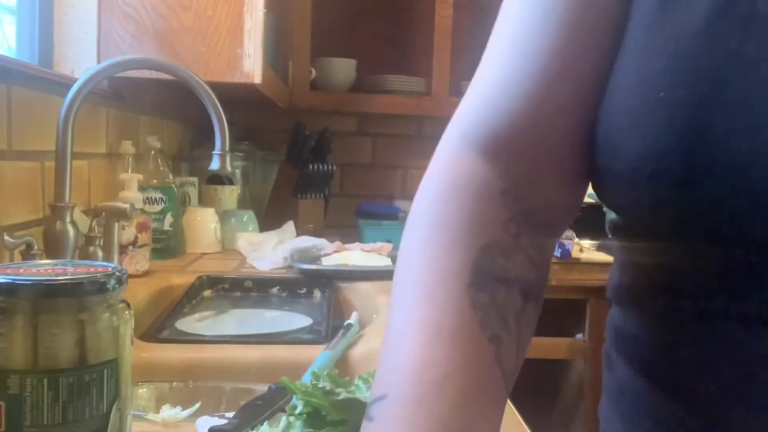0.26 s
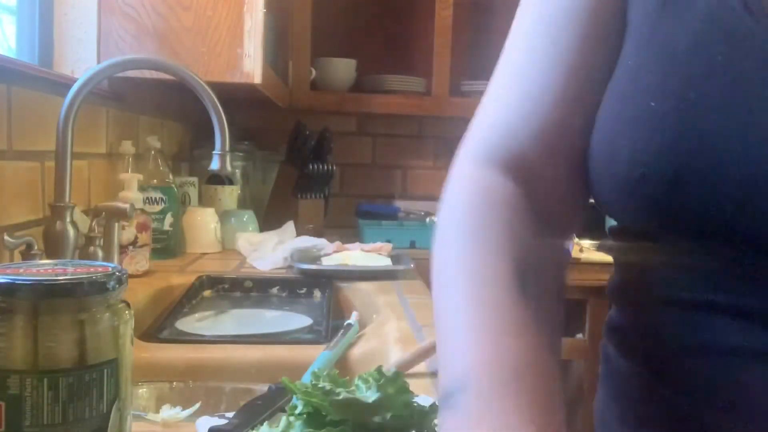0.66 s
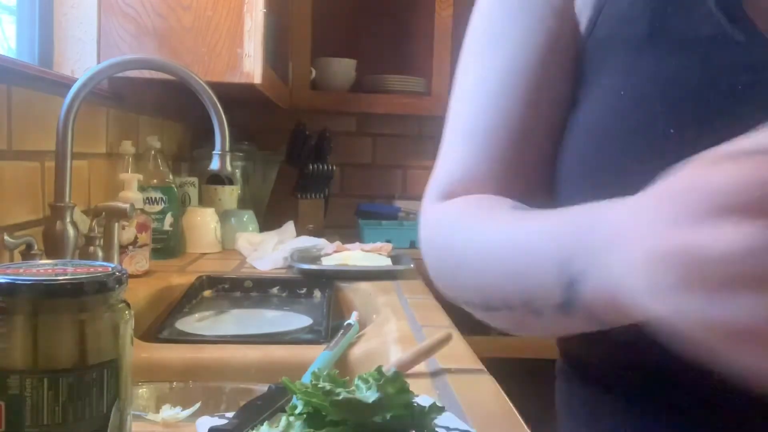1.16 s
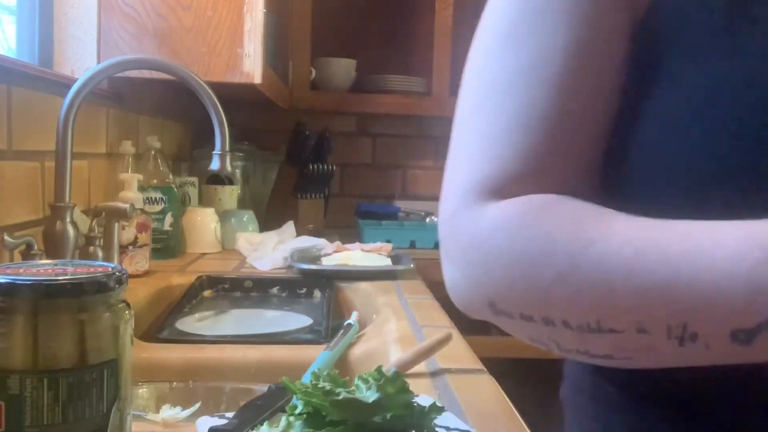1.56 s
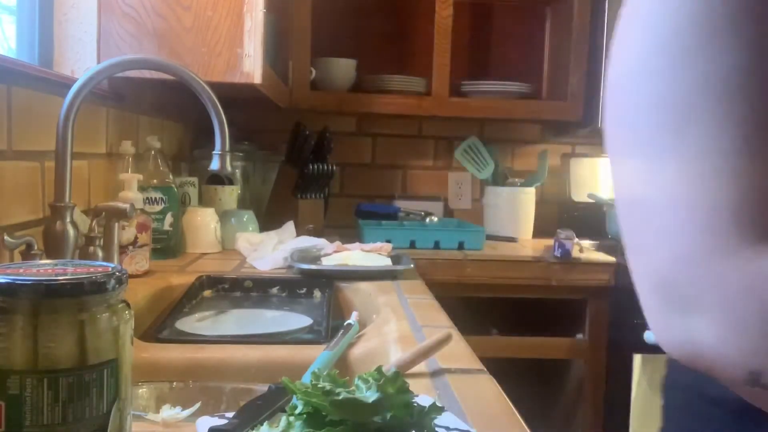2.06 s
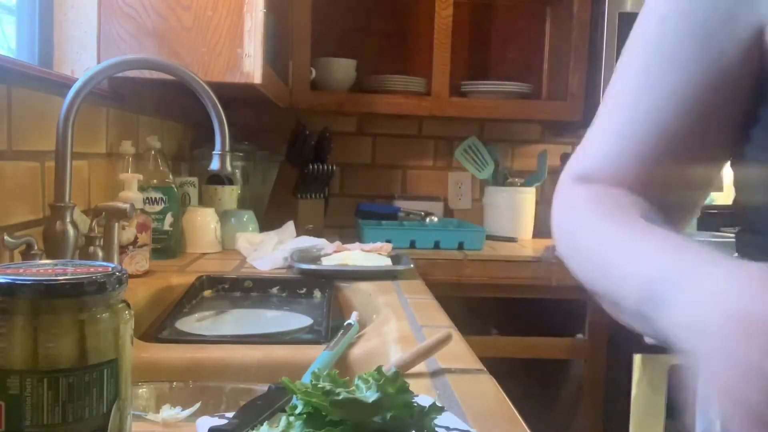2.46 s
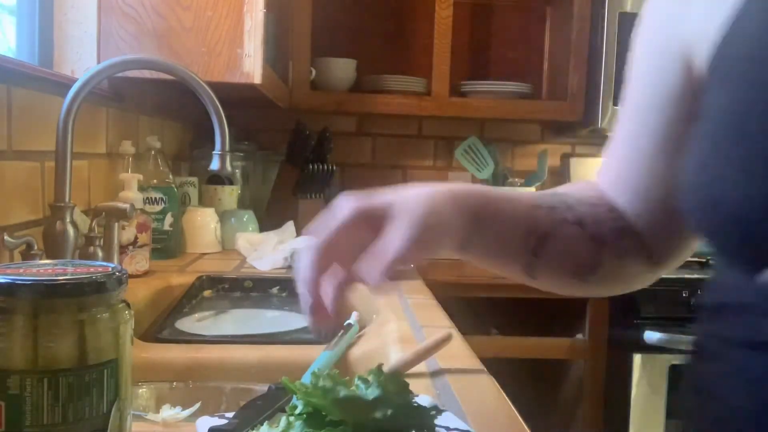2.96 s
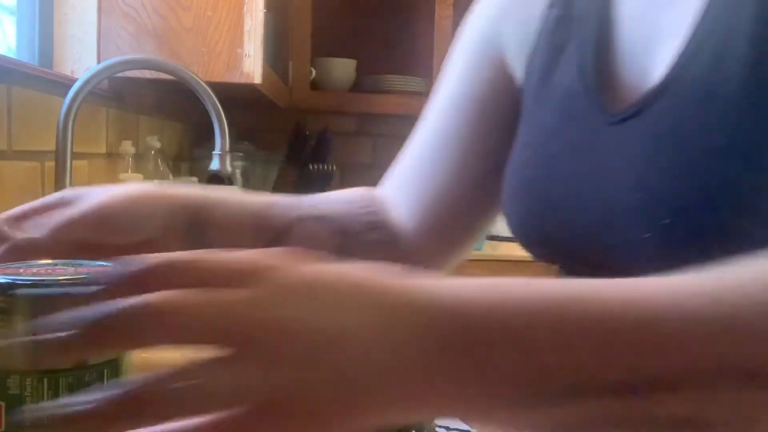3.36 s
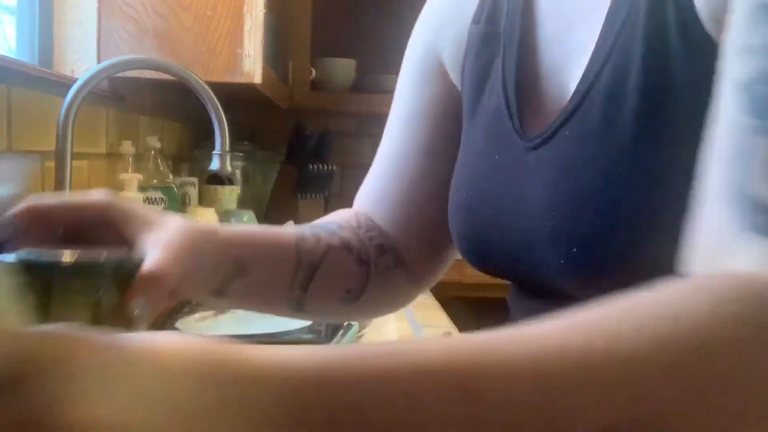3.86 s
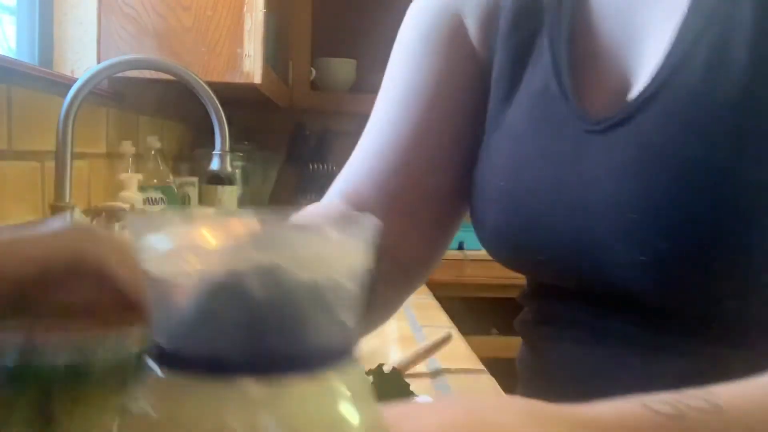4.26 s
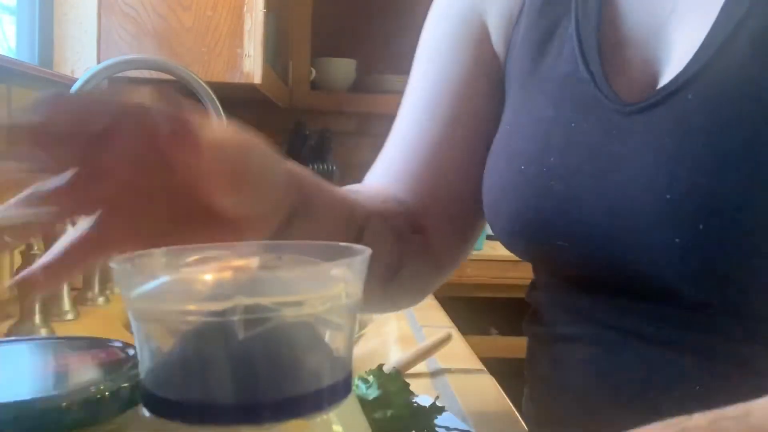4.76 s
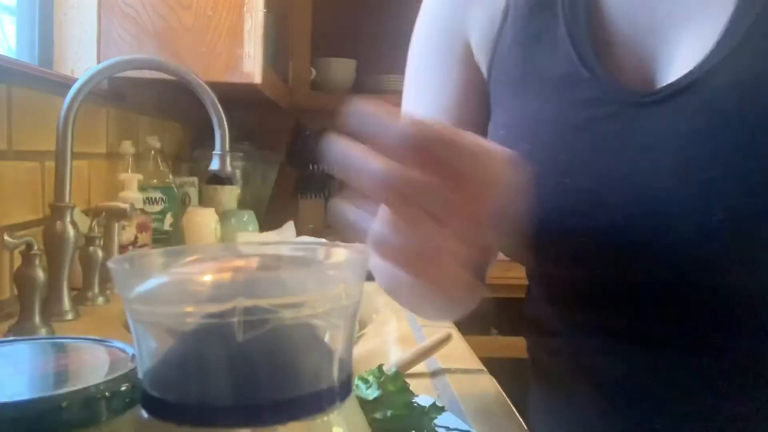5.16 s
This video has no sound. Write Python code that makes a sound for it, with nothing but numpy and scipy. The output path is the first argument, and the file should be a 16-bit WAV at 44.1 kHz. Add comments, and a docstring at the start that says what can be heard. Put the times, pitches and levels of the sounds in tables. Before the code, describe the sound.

Hands handle crackly plastic on a worktop: about one second of crowded clicks, hollow rattles and a brief ribbed buzz, then sparser bright snaps and a knock. After a quiet pause with soft fabric swishes, light wooden taps and a short pitched squeak lead to one sharp, woody jar knock with a smaller rebound. Close stereo phone microphone, short room reflections, faint low hum underneath.

```python
"""Tub and jar on a kitchen counter

Hands shift a plastic tub and leafy food on a wooden counter, then lift a jar and set it down with a sharp knock
and one bounce, close to a phone on the same counter. Scrapes are dense random slips, chatter is nearly even slips,
snaps are short noise bursts and knocks are brief pushes; they ring damped modes of plastic and wood.
Clothing swishes faintly as filtered noise, and a fridge hums in a small tiled room.
"""
import sys
import numpy as np
from scipy import signal
from scipy.fft import rfft, irfft, next_fast_len
from scipy.io import wavfile
from scipy.ndimage import uniform_filter1d

SR = 44100
rng = np.random.default_rng(int(sys.argv[2]) if len(sys.argv) > 2 else 0)


def waveform_to_disk(signal):
    """Save audio, clipped to [-1, 1], as 16-bit WAV at the path in sys.argv[1]."""
    frames = np.transpose(np.atleast_2d(signal))
    scaled = np.clip(frames, -1, 1) * 32767
    samples = np.round(scaled).astype(np.int16)
    wavfile.write(sys.argv[1], SR, samples)


N = 239091
t = np.arange(N) / SR  # time in seconds

# Strokes of dragged and squeezed plastic. Each row: peak time in seconds, scrape level in dB, swell and fade
# in seconds, then fizz, tub ring and counter rumble in dB above the scrape, and ring centre in Hz.
STROKES = [(.002, -36.5, 0.024, 0.13, -10, -1, -18, 710), (0.059, -52, 0.21, 0.042, 16, 22, -7.5, 830),
           (.124, -30, 0.002, 0.02, 0, 3.5, -24, 710), (0.175, -46.5, 0.12, 0.037, 5, 15, 8, 606),
           (0.247, -35.5, 0.0047, 0.21, 4, 9.5, -26, 786), (0.325, -40.5, 0.13, 0.02, 6, 11, -16, 807),
           (0.363, -46.5, 0.04, 0.051, -12, 17, 18.5, 750), (.385, -54, 0.025, 0.11, 2, -2, -31, 900),
           (0.454, -38.5, 1, 0.055, 1, 3.5, -9, 890), (0.534, -43, 0.0048, 0.17, 6, -6, -12, 965),
           (.548, -41, 0.029, 0.17, 9.5, 6.5, -20, 960), (0.594, -43, 0.25, 0.027, 2, 8, -16, 935),
           (0.678, -29.5, 0.0031, 0.025, 2, 5, -14, 517), (0.746, -38.5, 0.13, 0.26, 0, 5, 0, 745),
           (.925, -51.5, 0.24, 0.19, 5.5, 10.5, -9, 930), (.966, -31, .004, .016, -3, 3, -10, 550),
           (1.0, -65.5, .04, 1, 11, 14, 12, 600), (1.043, -38.5, 0.0042, 0.035, -12, -4, -15, 760),
           (1.112, -66.5, 0.14, 0.16, -7, 17, 2.5, 780), (1.331, -54.5, 0.0065, 0.051, 0.5, 4, -2, 426),
           (1.52, -32, 0.035, 0.053, 0.5, 3.5, -2, 490), (1.669, -38.5, 0.29, 0.19, 1, -3, -2.5, 635),
           (1.779, -62, 0.12, 0.35, -0.5, -2, -12.5, 620), (1.908, -48, 0.042, 0.14, 0, 1, -15, 470),
           (1.997, -45.5, 0.041, 0.23, 2.5, 4, 2, 500), (2.136, -42, 0.034, 0.072, -1, -3.5, -7, 726),
           (2.17, -60.5, 0.059, 0.78, 1.5, 3.5, -2, 500), (2.31, -47.5, 0.0071, 0.14, 13.5, 9.5, 4.5, 450),
           (3.7, -65, 0.043, 0.27, 3, 2, 25, 388), (3.765, -59, 0.069, 0.1, -10, 24, 14, 396),
           (3.792, -52, 0.095, 0.097, -1, 9.5, 14.5, 420), (3.884, -44.5, 0.042, 0.062, -4.5, 2, -20, 795),
           (3.935, -69, 0.11, 0.07, 7, -4, 11, 1090), (3.96, -59.5, 0.05, 0.063, -8, 7.5, 18, 680),
           (4.385, -38, .007, .15, -5, 16, 16, 620), (4.554, -69.5, 0.11, 0.25, 9, 26, 27, 446),
           (4.575, -63.5, 0.019, 0.066, -13, 30.5, 42.5, 443), (4.794, -63, 0.023, 0.05, 14.5, 4, 16, 696),
           (4.83, -61, 0.18, 0.027, -2, 2.5, 0, 542)]
# Colour of the scrape. Each row: frequency in Hz, relative level in dB per Hz.
SCRAPE_COLOUR = [(1200, -8), (2000, -1.5), (3500, 3.5), (5000, -1.5), (7000, -25)]
# Colour of the fizz. Each row: frequency in Hz, relative level in dB per Hz.
FIZZ_COLOUR = [(4000, -9), (6000, -1.5), (9000, -2), (12000, -6), (15500, -13.5), (17000, -46.5)]
# Resonances of the tub walls. Each row: frequency in Hz, width in Hz, relative level in dB.
TUB_MODES = [(468, 46, 1), (599, 160, -14), (890, 360, 0), (1182, 93, 1.5), (1566, 160, -3.5)]
# Ribbed plastic under a sliding edge. Each row: start and end in seconds, relative level in dB,
# slips per second at the start, the rate it heads for, and a last rate that is not used.
CHATTER = [(0.311, .331, -29, 208.3, 189.3, 174), (0.373, .468, -30.5, 234.9, 225.4, 119.1)]
# Resonances of the ribs. Each row: frequency in Hz, width in Hz, relative level in dB.
RIB_MODES = [(826, 70, -1.5), (1586, 130, -3.5), (1990, 86, -1), (2815, 200, 3.5), (3135, 160, 0),
             (3610, 92, -2)]
# Snaps and taps. Each row: start in seconds, crack peak in dB, tub ring above the crack in dB,
# pitch of the crack in Hz, ring centre in Hz, pitched part of the crack against its noise in dB.
TAPS = [(0.0098, -22.5, 0.5, 3520, 614, -13.5), (.022, -27, -11, 3800, 700, -10),
        (0.0336, -23.5, -33, 3720, 676, -11), (0.0558, -31, 4, 4020, 446, 1),
        (0.094, -41, -12, 5360, 450, -5), (0.1233, -24, -2, 4400, 883, 0), (0.147, -31, 2, 1780, 424, -4),
        (0.212, -33, 2, 5600, 1180, -1), (0.2334, -23.5, 4.5, 2704, 851, -11),
        (0.2472, -30, 16, 2130, 854, -24.5), (0.2555, -20.5, 6.5, 2650, 900, -14),
        (0.262, -24, 10, 2930, 900, 4), (0.279, -32, -4, 2060, 870, 6), (.288, -35, 0, 2040, 870, 5),
        (0.359, -34, 1, 2000, 1200, -7), (0.4705, -27, -0.5, 2480, 872, -10),
        (0.4905, -48, 12.5, 2000, 877, -8), (0.5245, -26.5, -2.5, 2000, 980, -5),
        (0.594, -41, 10.5, 1940, 800, -10), (0.601, -29, 0, 1920, 396, -15),
        (0.6792, -24, -12, 1720, 1200, 5), (0.7088, -36, 12, 1980, 1100, -6),
        (0.7145, -23, 3, 2020, 570, -3), (0.7373, -25.5, 12, 2000, 1180, 0),
        (0.7575, -35.5, -5, 2280, 1100, 3), (0.767, -31, -8, 2030, 1100, 9),
        (0.7495, -25.5, -22, 2030, 393, -4), (0.7758, -30, -23, 3430, 1170, -6),
        (0.871, -36.5, 6, 1860, 900, -1), (0.9164, -26.5, 1, 2610, 1160, -6),
        (0.9645, -16.5, 5.5, 1866, 870, -4), (0.981, -30, -5, 1950, 406, -15),
        (1.043, -30, -2, 1930, 1100, -18), (1.105, -37, -19, 3020, 800, -19),
        (1.3316, -41, -33.5, 2980, 353, 9), (1.475, -37, -4, 10900, 479, -11),
        (1.497, -45, -20, 9000, 480, -18), (1.511, -24, -32.5, 1920, 450, -9),
        (1.5781, -30.5, -29, 8450, 484, 9), (1.6118, -27.5, -5.5, 5770, 455, -2),
        (1.636, -41, -15, 7000, 480, -10), (1.6579, -18.5, -8, 4640, 525, -10),
        (1.671, -15, -19.5, 8670, 832, -6.5), (1.697, -35, -20, 8500, 480, -6),
        (1.71, -35, -20, 8500, 480, 3), (1.7676, -33, -5, 2980, 365, 4),
        (1.9066, -27.5, -7, 2270, 383, 5.5), (1.9985, -22, -33.5, 11070, 417, -13),
        (2.035, -41, 1, 7500, 900, -17), (2.0852, -38, -5.5, 5660, 390, -7),
        (2.121, -41, -23, 3450, 450, 10), (2.1332, -32.5, -27, 2050, 450, -2),
        (2.212, -45, -15, 7430, 458, 6), (2.3097, -29, -16, 7900, 700, -10),
        (3.703, -37.5, 1.5, 3500, 355, -8.5), (3.748, -48, 15, 2530, 600, 2),
        (3.794, -47, 12, 3300, 600, -1), (3.8461, -41.5, 10, 2000, 370, 5),
        (3.8764, -33, -31, 2180, 1240, 23), (3.883, -39.5, -6, 2580, 1200, 8),
        (3.896, -43, -22, 2280, 810, 3), (3.9117, -41, -4, 1800, 800, 7), (3.921, -39, 3, 1770, 800, 14),
        (3.9302, -42.5, 10.5, 1710, 660, 17.5), (3.939, -46, -11, 1790, 660, 12),
        (3.957, -44, 3, 1880, 659, 15), (4.047, -67.5, 18.5, 2460, 1030, -7),
        (4.3818, -29, 9, 2000, 1150, 9.5), (4.553, -34.5, 12, 2020, 800, 4),
        (4.789, -29.5, -26, 11400, 1220, 2.5)]
# Jar or tub knocked on the counter. Each row: start in seconds, upper ring peak in dB, contact in seconds,
# deep boom above the upper ring in dB, share of the free ring time, focus of the ring in Hz,
# rattle of the base against the upper ring in dB.
KNOCKS = [(0.2458, -19.5, 0.00081, -43, 0.042, 610, -13), (0.2617, -23, 0.0022, -27.5, 0.034, 653, -8),
          (0.36, -19, 0.0033, -9, 0.12, 600, -20), (.681, -27.5, 0.00075, -11.5, 0.069, 400, -17),
          (.7155, -22.5, .001, -6.5, 0.046, 560, -7), (.7405, -22.5, 0.00093, -31, 0.039, 327, -6),
          (0.744, -24, 0.01, -0.5, 0.1, 300, -23), (0.9654, -13.5, 0.00093, -12.5, 0.023, 600, -16),
          (.968, -19.5, 0.0014, -13.5, 0.035, 480, -28), (2.3128, -18, 0.0014, -20, 0.031, 420, -21.5),
          (2.321, -30, 0.002, -4, 0.074, 300, -14), (3.7, -44, 0.0015, -9.5, .15, 400, -19),
          (3.738, -38.5, 0.0012, -10, 0.16, 600, -3.5), (3.75, -26, 0.0022, -23, 0.13, 378, -16),
          (3.765, -23.5, 0.0011, -23.5, 0.074, 400, -28), (3.777, -28.5, 0.0022, -11.5, 0.059, 330, -13),
          (3.797, -24, 0.0027, -10.5, 0.1, 250, -31.5), (4.3795, -18.5, 0.00028, -15, 0.053, 1500, -6),
          (4.3813, -4.5, .00045, -15.5, 0.041, 1200, -9.5), (4.3833, -9, 0.00088, -13.5, 0.054, 510, -11.5),
          (4.384, -13, 0.0008, 8.5, 0.14, 470, -5), (4.396, -10, 0.00061, -4.5, 0.22, 603, -5),
          (4.41, -14.5, 0.0011, -9, 0.25, 500, -10), (4.427, -17.5, 0.00035, -18, 0.51, 800, -4.5),
          (4.478, -21, 0.001, -1, 0.12, 700, -2), (4.561, -32.5, 0.0029, 10.5, 0.081, 300, -7),
          (4.574, -15, 0.0014, -8.5, 0.092, 447, -29), (4.582, -15.5, 0.00107, 1, 0.15, 443, -13),
          (4.602, -24.5, 0.0014, -1, 0.33, 456, -1)]
# Resonances of the worktop. Each row: frequency in Hz, relative level in dB, free time to fall 60 dB in seconds.
COUNTER_MODES = [(48, -8, 0.35), (92.4, -10.5, 0.55), (116.3, 1, 0.28), (166.2, -0.5, 0.12),
                 (195, -3.5, 0.17), (250, -1.5, 0.12), (307, -6.5, 0.16), (391, -2.5, 0.32),
                 (462.3, 1, 0.36), (535, -5.5, 0.29), (688, -21.5, 0.31), (859, -3.5, 0.2),
                 (1243, -9.5, 0.15), (1260, -6, 0.33), (1560, -4, 0.21), (1810, -11.5, 0.4),
                 (1940, -9.5, 0.81), (2340, -23.5, .2), (2830, -25, .15), (3180, -40, .2),
                 (3890, -34.5, .29)]
# Clothing. Each row: start of full level in seconds, level in dB, swell, hold and fade in seconds,
# fuller low part above that level in dB.
SWISHES = [(1.145, -80, .1, 0.0054, 0.53, 1), (1.342, -62.5, 0.24, 0.0067, 0.12, -7),
           (2.43, -66, 0.11, .12, 0.11, -11), (2.833, -68.5, 0.074, 1, 0.47, -2.5),
           (3.376, -61.5, 0.25, 0.0064, 0.37, -5.5), (3.69, -59.5, 0.022, 0.0061, 0.038, -0.5),
           (4.19, -70.5, 0.33, 0.444, 0.044, -0.5), (4.583, -65, 0.12, 0.014, 0.058, 15.5),
           (4.99, -64.5, 0.14, 0.69, 0.11, -8), (5.156, -66, 0.3, 0.0077, 0.63, -5.5)]
# Colour of the cloth hiss. Each row: frequency in Hz, relative level in dB per Hz.
CLOTH_COLOUR = [(1500, -16), (2500, -3.5), (4000, 0.5), (6000, 1), (9000, -5), (15500, -8.5),
                (17000, -41.5)]
# Colour of its fuller low part. Each row: frequency in Hz, relative level in dB per Hz.
CLOTH_LOW_COLOUR = [(350, -22.5), (700, -0.5), (1400, -1.5), (2200, -6.5), (3500, -39)]
# Colour of the background noise. Each row: frequency in Hz, relative level in dB per Hz.
KITCHEN_COLOUR = [(13, -57.5), (22, -33), (43, -10), (65, -7), (88, -4.5), (166, -35), (245, -16),
                  (351, -24.5), (392, -17.5), (503, -37), (978, -68), (1360, -42), (1800, -76.5),
                  (10300, -62.5), (16500, -73)]
# Hum of the fridge. Each row: frequency in Hz, width in Hz, average (rms) level in dB.
FRIDGE_HUM = [(59.73, 0.77, -49), (114.4, 7.2, -56.5)]
# Difference between the microphone ports. Each row: frequency in Hz, side minus mid in dB.
PORT_COLOUR = [(60, -25.5), (110, -18), (200, -20), (380, -8.5), (700, -2), (1290, -3.5), (2380, 4),
               (4400, 0.5), (8120, 1.5), (15000, -1.5)]

FIZZ_LINGERS, RING_LINGERS, RUMBLE_LINGERS = 0.73, 1.21, 1.35  # fade times relative to the scrape
SWING_DB = 30  # swell and fade times are the times to cross this range
DRAG_PAN_DB, JAR_PAN_DB = 1, 2  # left minus right
THUMP_DB, TAP_SCATTER_DB = -28.5, 3.5  # counter thump against the crack; left-right spread of the taps
FOCUS_DB = 2.5  # fall of a worktop mode one octave from the focus
THUD_DB, THUD_CYCLES = -2, 2.3  # thud against the upper ring; its ring time in cycles
KITCHEN_DB = -50
ROOM_T60_S, ROOM_TREBLE_T60_S, ROOM_DB = 0.25, 0.16, -13.5  # times to fall 60 dB; tail level
PORTS_DB = -1
TOP_HZ = 16700


def drag():
    """Plastic sticks and slips unevenly, shaking the tub walls, while separate noise rumbles in the counter."""
    happens = rng.random(N) < .4
    slips = rng.standard_normal((2, N)) * undb(1.5 * rng.exponential(size=N)) * happens
    slips = slips * undb(1.14 * walk(180))
    power, octaves = np.zeros((4, N)), 0
    for s, db, swell_s, fade_s, fizz_db, ring_db, rumble_db, hz in STROKES:
        layers = [(0, 1), (fizz_db, FIZZ_LINGERS), (ring_db, RING_LINGERS), (rumble_db, RUMBLE_LINGERS)]
        stroke = np.array([gesture(s, db + above_db, swell_s, fade_s * linger) for above_db, linger in layers])
        power += stroke
        octaves = octaves + stroke[2] * np.log2(hz)
    gain = np.sqrt(power)
    # the strongest stroke at each moment has most say in the ring centre
    centre_hz = 2 ** (octaves / power[2])
    scrape_facets = creases(slips[0], 1302, 6630, count=14, patchy_db=2.5)
    scrape = unit(colour(scrape_facets, SCRAPE_COLOUR)) * gain[0]
    fizz_facets = creases(slips[1], 4240, 14900, count=12, patchy_db=2.5)
    fizz = unit(colour(fizz_facets, FIZZ_COLOUR)) * gain[1]
    walls = tub(slips[0], centre_hz)
    # even out the ring before the strokes set its level
    walls = walls / np.sqrt(uniform_filter1d(walls ** 2, size=4000)) * gain[2]
    rumble = unit(counter(rng.standard_normal(N), damp=0.25, low_hz=80, top_hz=350)) * gain[3]
    return (scrape + fizz + walls) * sides(DRAG_PAN_DB)[:, None] + rumble


def chatter():
    """An edge slips over ribs at a nearly even, slowing rate; each slip is a tiny burst that rings the ribs."""
    slips = np.zeros(N)
    for start, end, db, first_rate, next_rate, _ in CHATTER:
        reach_s = 0.48 * start + .65 * end  # lies after the end, so the slowing is cut short
        rate = np.interp(t, [start, reach_s], [first_rate, next_rate]) * (1 + 0.094 * walk(150))
        # one slip each time the running count passes a whole number
        wraps = np.diff(np.floor(np.cumsum(rate) / SR), prepend=0) * (t > start) * (t < end)
        slips += wraps * undb(db + 1.2 * rng.standard_normal(N))
    burst = signal.lfilter([1], [1, -.9], slips) * (1 + rng.standard_normal(N))
    ribs = 0
    for k, (hz, width, db) in enumerate(RIB_MODES):
        ribs = ribs + (-1) ** k * undb(db) * ring(burst, hz, width_t60(width))
    return 0.21 * ribs * sides(DRAG_PAN_DB)[:, None]


def taps():
    """Each snap is a short crack of noise, a ring of the tub walls and a dull thump of the counter."""
    out, u = np.zeros((2, N)), np.arange(SR // 5) / SR
    push = np.exp(-u / 0.0061) * (1 - np.exp(-u / 0.011))
    thump = peak(counter(push, damp=0.05, low_hz=20, top_hz=300))
    noises = rng.standard_normal((len(TAPS), len(u)))
    for (s, db, ring_db, hz, ring_hz, pitched_db), noise in zip(TAPS, noises):
        fade = np.exp(-u / 0.0015) + 0.08 * np.exp(-u / 0.0068)
        burst = noise * (1 - np.exp(-u / 0.0012)) * fade
        pitched = ring(noise * (1 - np.exp(-u / 0.001)) * np.exp(-u / 0.004), hz, 28.0 / hz)
        crack = peak(peak(band(burst, 1800, TOP_HZ)) + undb(pitched_db) * peak(pitched))
        walls = peak(tub(noise * (1 - np.exp(-u / 0.00041)) * np.exp(-u / 0.0039), ring_hz))
        pan = sides(TAP_SCATTER_DB * noise[0])[:, None]
        snap = (crack + undb(ring_db) * walls) * pan + undb(THUMP_DB) * thump
        add(out, undb(db) * snap, s)
    return out


def jar():
    """A half-sine push thuds and rings the worktop; the base rattles briefly and feeds the upper modes unevenly."""
    out, u = np.zeros(N), np.arange(SR // 2) / SR
    noises = rng.standard_normal((len(KNOCKS), len(u)))
    for (s, db, contact_s, deep_db, free, focus_hz, rattle_db), noise in zip(KNOCKS, noises):
        push = np.sin(np.pi * np.clip(u / contact_s, 0, 1))
        deep = counter(push, damp=0.94, low_hz=20, top_hz=200)
        rough = noise * (1 - np.exp(-u / 0.0027)) * np.exp(-u / 0.001)
        rattle = undb(rattle_db) * peak(signal.fftconvolve(rough, push)[:len(u)])
        upper = counter(push + 1.5 * rattle, damp=free, low_hz=200, top_hz=5000, focus_hz=focus_hz)
        # the thud is a short swing at the focus, rung twice
        swing = ring(np.diff(push, prepend=0), focus_hz, THUD_CYCLES / focus_hz)
        thud = -undb(THUD_DB) * peak(ring(swing, focus_hz, THUD_CYCLES / focus_hz))
        add(out, undb(db) * (peak(upper) + thud + undb(deep_db) * peak(deep) + rattle), s)
    return out * sides(JAR_PAN_DB)[:, None]


def swish():
    """Rubbing fabric makes a smooth hiss that swells and fades as the arms move."""
    high, low = 0, 0
    for s, db, swell_s, hold_s, fade_s, low_db in SWISHES:
        high = high + gesture(s, db, swell_s, fade_s, hold_s)
        low = low + gesture(s, db + low_db, swell_s, fade_s, hold_s)
    hiss = 0
    for power, cloth in [(high, CLOTH_COLOUR), (low, CLOTH_LOW_COLOUR)]:
        hiss = hiss + np.sqrt(power) * unit(colour(rng.standard_normal(N), cloth))
    return hiss * undb(1.8 * walk(4.8))


def kitchen():
    """Low rumble of the house is coloured noise; the fridge's wavering hum is noise in narrow resonances."""
    hum = 0
    for hz, width, db in FRIDGE_HUM:
        hum = hum + undb(db) * unit(ring(rng.standard_normal(N), hz, width_t60(width)))
    rumble = unit(colour(rng.standard_normal(N), KITCHEN_COLOUR))
    return rumble * undb(KITCHEN_DB + 0.25 * walk(5.3)) + hum


def room(x):
    """Many blurred reflections form a tail, built octave by octave; the treble dies sooner."""
    u, tail = np.arange(SR * 3 // 4) / SR, 0
    for hz in 250 * 2 ** np.arange(6):
        t60 = np.interp(np.log2(hz / 250), [0, 5], [ROOM_T60_S, ROOM_TREBLE_T60_S])
        tail = tail + band(rng.standard_normal(len(u)), hz / 1.92, hz * 2.15) * undb(-60 * u / t60)
    tail = tail * np.clip(u / 0.0012, 0, 1)
    return undb(ROOM_DB) * signal.fftconvolve(x, tail / np.sqrt(np.sum(tail ** 2)))[:N]


def tub(x, centre_hz):
    """Thin walls ring briefly; resonances near the given centre speak loudest."""
    out = 0
    for hz, width, db in TUB_MODES:
        gain = undb(db - 10.3 * np.log2(hz / centre_hz) ** 2)
        out = out + gain * ring(x, hz, width_t60(width)) * width
    return out


def counter(x, damp, low_hz, top_hz, focus_hz=None):
    """Worktop modes between two frequencies, neighbours in opposite phase; those near any focus speak loudest."""
    out = 0
    for k, (hz, db, t60) in enumerate(COUNTER_MODES):
        if low_hz < hz < top_hz:
            fall_db = FOCUS_DB * np.log2(hz / focus_hz) ** 2 if focus_hz else 0
            out = out + (-1) ** k * undb(db - fall_db) * ring(x, hz, damp * t60)
    return out


def creases(slips, lo_hz, hi_hz, count, patchy_db):
    """Small facets, each with its own short ring, get louder and softer in turn, so the colour keeps shifting."""
    out = 0
    for k, hz in enumerate(np.geomspace(lo_hz, hi_hz, count)):
        facet = ring(slips * undb(patchy_db * walk(240)), hz, 10.3 / hz)
        out = out + (-1) ** k * facet * np.sqrt(hz)
    return out


def gesture(s, db, swell_s, fade_s, hold_s=0):
    """Power over time of one movement: swell, hold, fade."""
    away = np.maximum(0, np.maximum((s - t) / swell_s, (t - s - hold_s) / fade_s))
    return undb(2 * (db - SWING_DB * np.minimum(away, 5)))


def ring(x, hz, t60):
    """One damped mode: a swing at hz that falls 60 dB in t60 seconds."""
    r, w = np.exp(-np.log(1000) / (t60 * SR)), 2 * np.pi * hz / SR
    return signal.lfilter([0, r * np.sin(w)], [1, -2 * r * np.cos(w), r * r], x)


def width_t60(width_hz):
    """Time to fall 60 dB for a resonance of this width: the wider, the shorter."""
    return np.log(1000) / (np.pi * width_hz)


def walk(rate):
    """Random levels held for 1 / rate seconds, then smoothed twice; spread near 1."""
    k = int(SR / rate)
    steps = np.repeat(rng.standard_normal(N // k + 1), k)
    return unit(uniform_filter1d(uniform_filter1d(steps, k), k)[:N])


def colour(x, points):
    """Filter by (Hz, dB) points joined on a log-frequency axis."""
    size = next_fast_len(len(x))
    hz, db = np.transpose(points)
    bins_hz = np.arange(size // 2 + 1) * SR / size
    gain = undb(np.interp(np.log(bins_hz + 1), np.log(hz), db))
    return irfft(rfft(x, size) * gain, size)[:len(x)]


def band(x, lo_hz, hi_hz):
    """Gentle band-pass."""
    edges = [lo_hz, min(hi_hz, .45 * SR)]
    return signal.sosfilt(signal.butter(2, edges, "bandpass", fs=SR, output="sos"), x)


def undb(db):
    """Gain of a level in dB."""
    return 10 ** (np.asarray(db) / 20)


def unit(x):
    """Scale to an average (rms) level of 1."""
    return x / np.sqrt(np.mean(x ** 2))


def peak(x):
    """Scale to peak 1."""
    return x / np.abs(x).max()


def sides(pan_db):
    """Left and right gains."""
    return undb(np.array([pan_db, -pan_db]) / 2)


def add(out, x, s):
    """Mix x into out from time s."""
    i = int(s * SR)
    out[..., i:i + x.shape[-1]] += x[..., :N - i]


def scene():
    """All sources in the room, as two microphone ports hear them."""
    hands = drag() + taps() + jar() + chatter()
    air = hands + room(hands.mean(axis=0)) + swish() + kitchen()
    # the ports hear different near reflections, in a drifting blend: alike in the bass, unlike in the treble
    near = rng.standard_normal((2, 1500)) * np.exp(-np.arange(1500) / 210.0)
    mid = air.mean(axis=0)
    one, other = (signal.fftconvolve(mid, h / np.sqrt(np.sum(h ** 2)))[:N] for h in near)
    turn = np.cumsum(9 + 14 * walk(6)) / SR  # angle of the blend in radians
    unlike = colour(one * np.cos(turn) + other * np.sin(turn), PORT_COLOUR)
    return air + undb(PORTS_DB) * unlike * np.array([[1], [-1]])


def record(dry):
    """The phone rounds the loudest peaks and cuts the top."""
    rounded = np.tanh(dry ** 3 / 3 + dry)
    return 0.81 * signal.sosfilt(signal.ellip(10, .2, 80, TOP_HZ, fs=SR, output="sos"), rounded)


dry = scene()
out = record(dry)
waveform_to_disk(out)
```